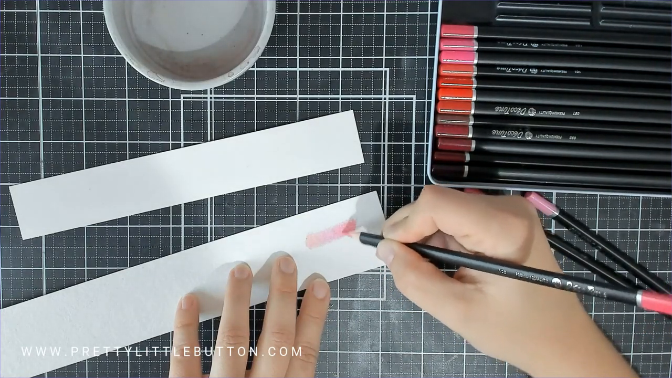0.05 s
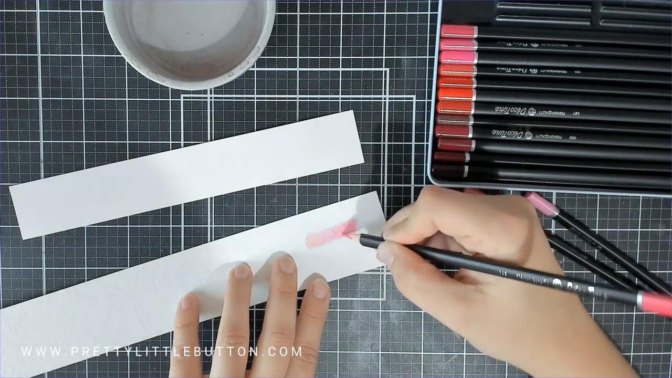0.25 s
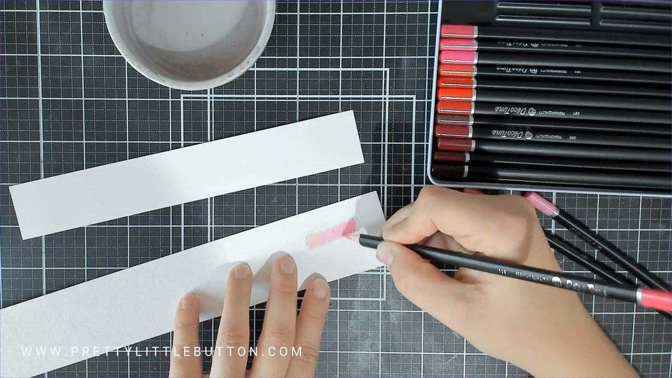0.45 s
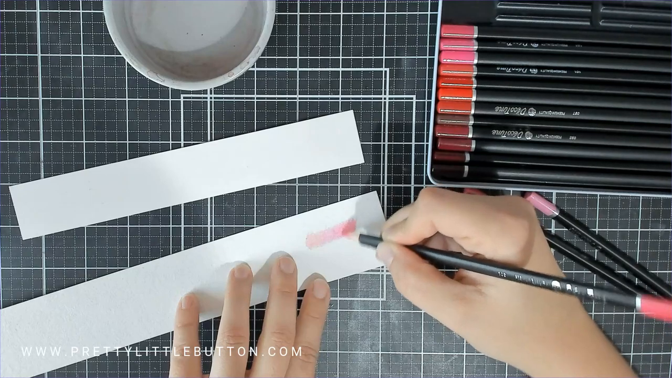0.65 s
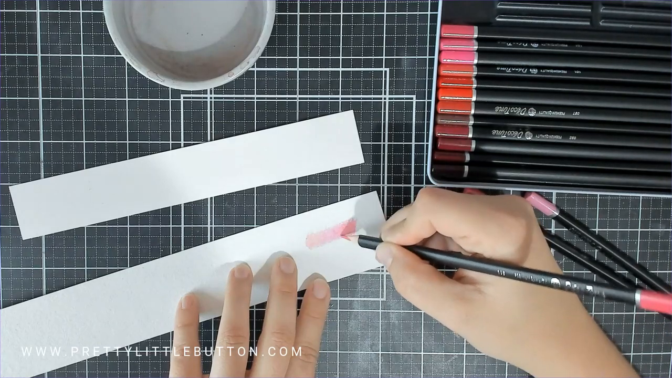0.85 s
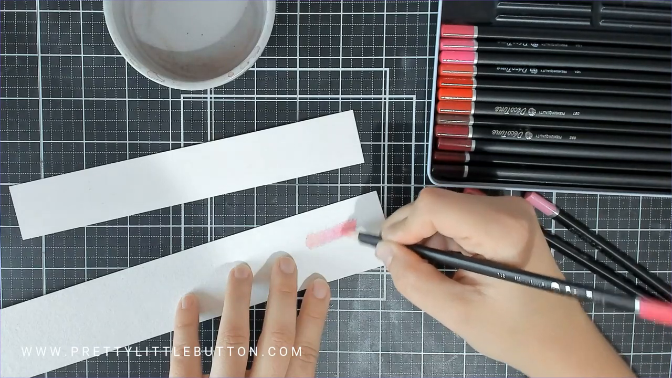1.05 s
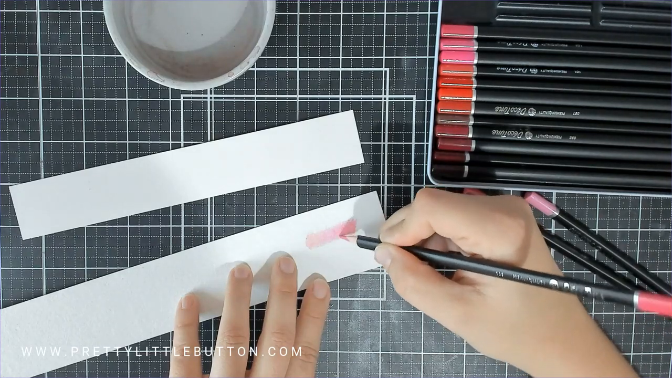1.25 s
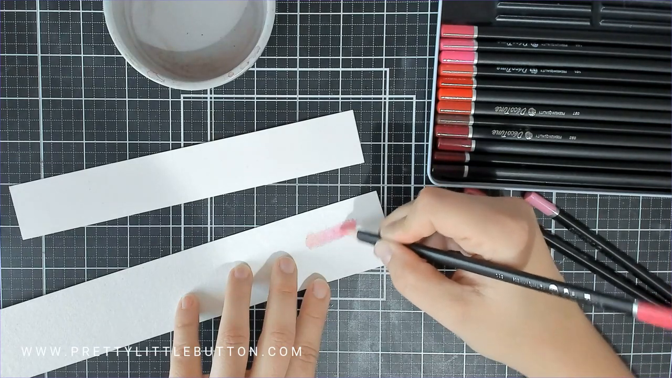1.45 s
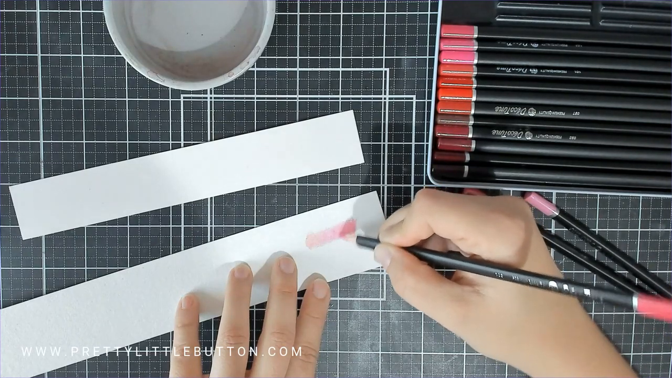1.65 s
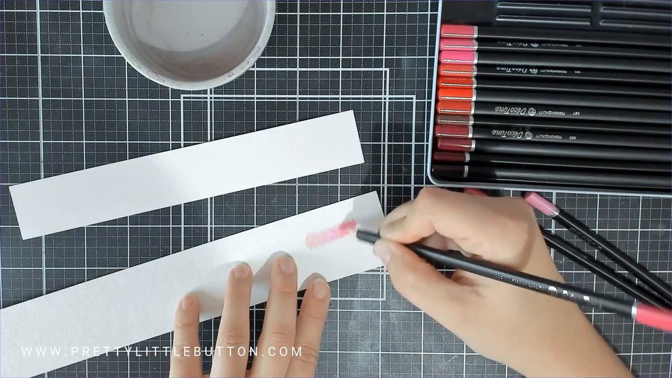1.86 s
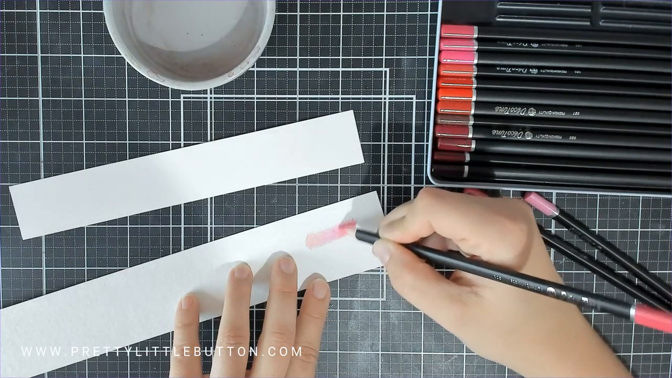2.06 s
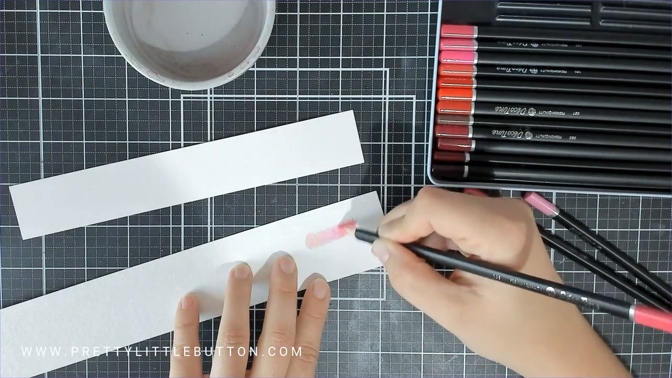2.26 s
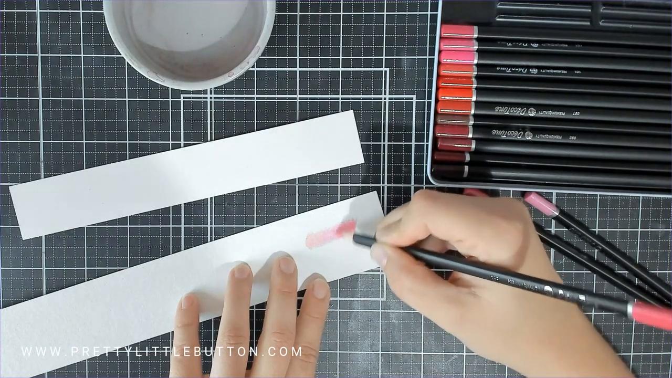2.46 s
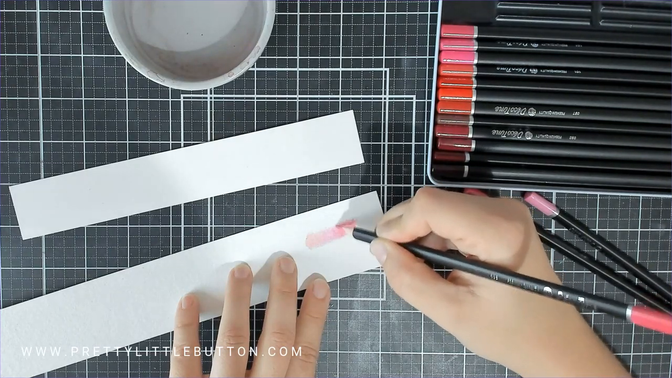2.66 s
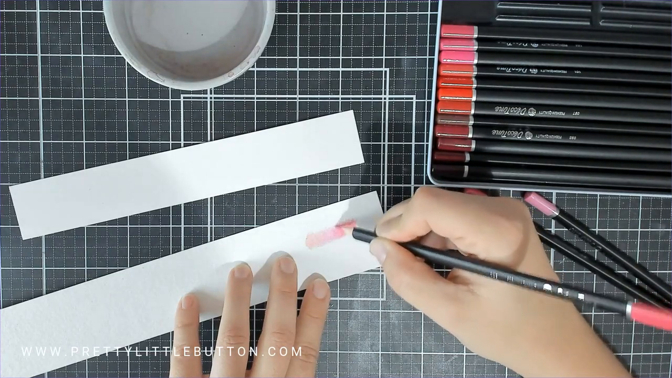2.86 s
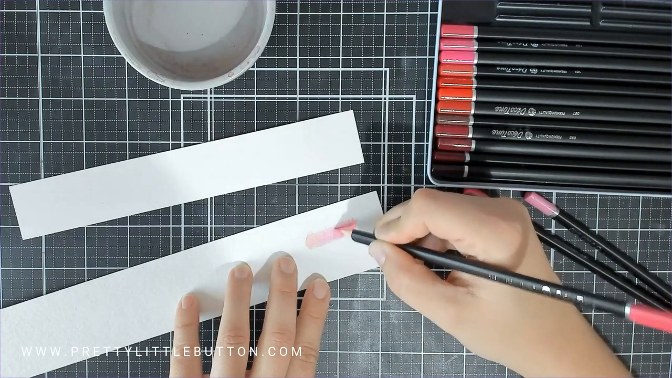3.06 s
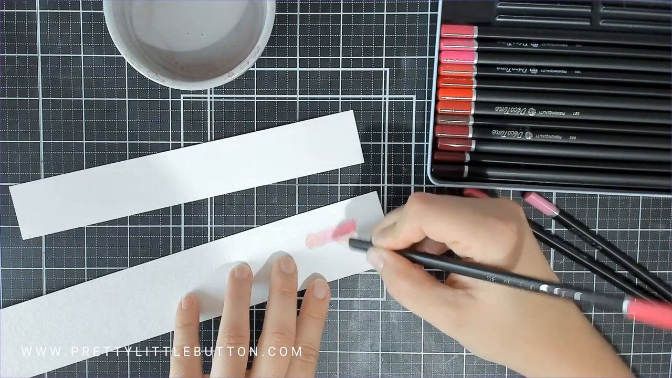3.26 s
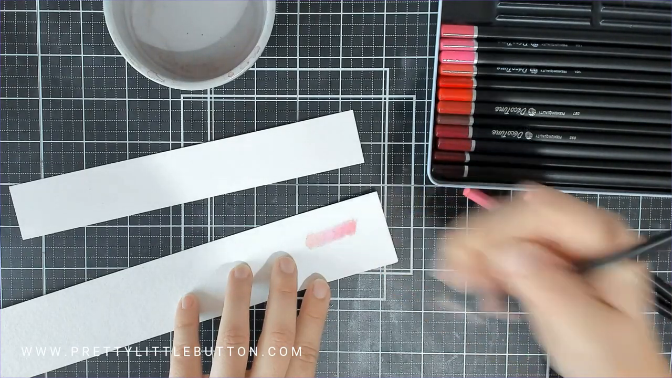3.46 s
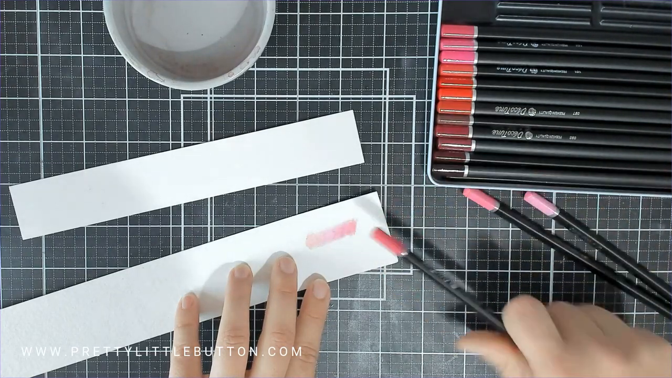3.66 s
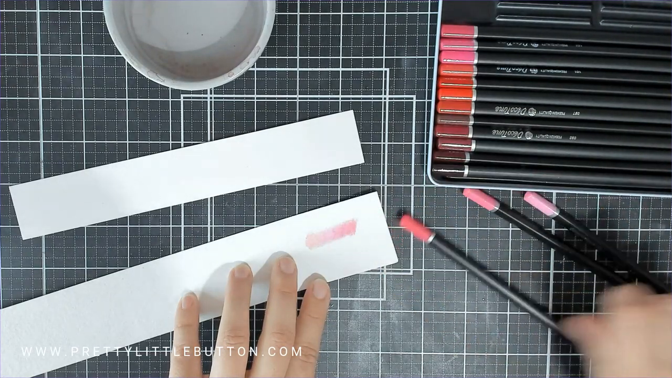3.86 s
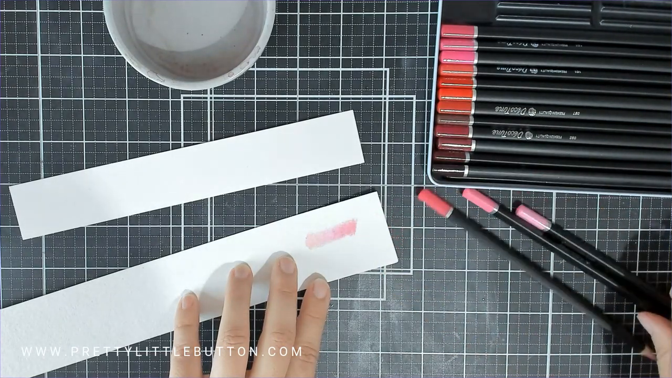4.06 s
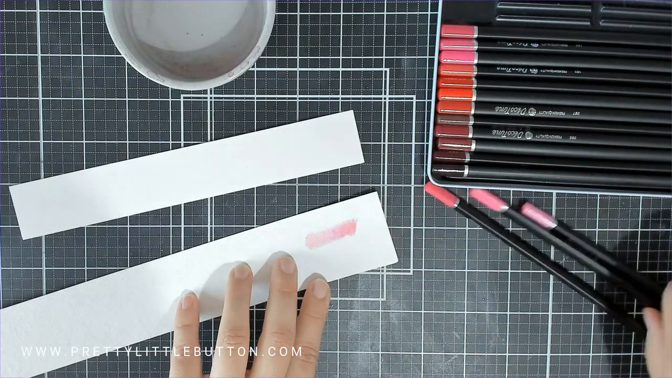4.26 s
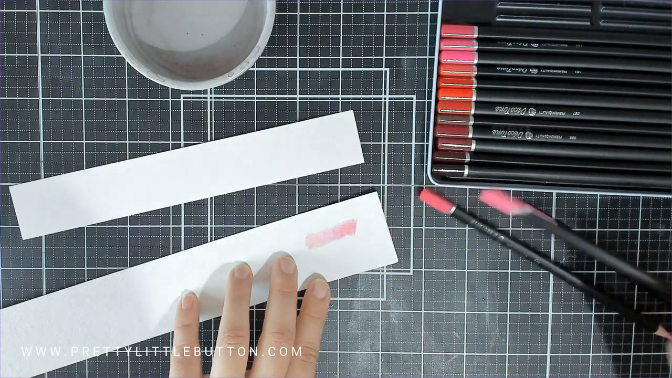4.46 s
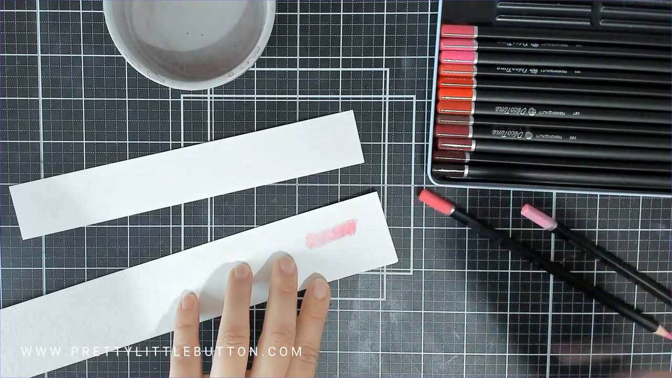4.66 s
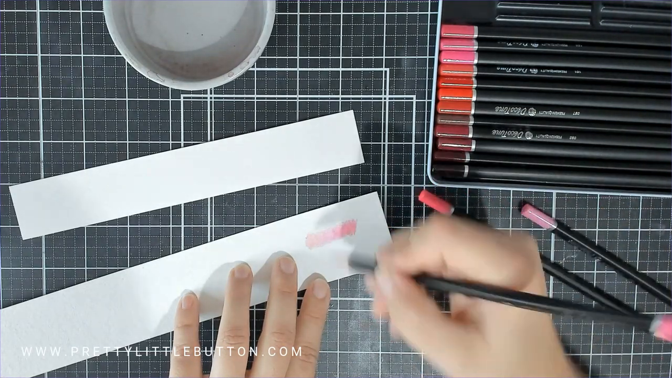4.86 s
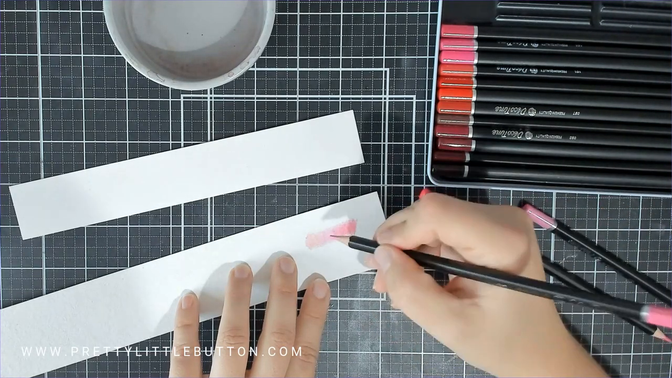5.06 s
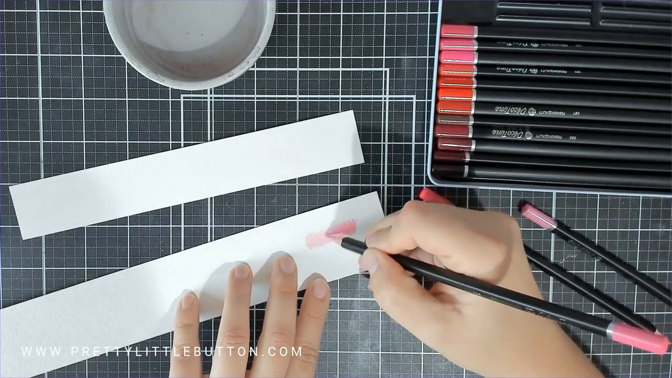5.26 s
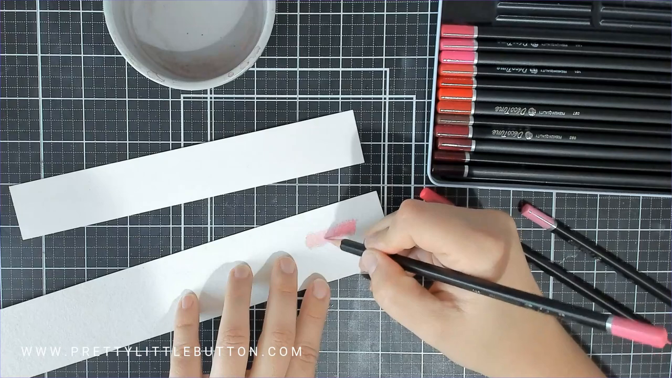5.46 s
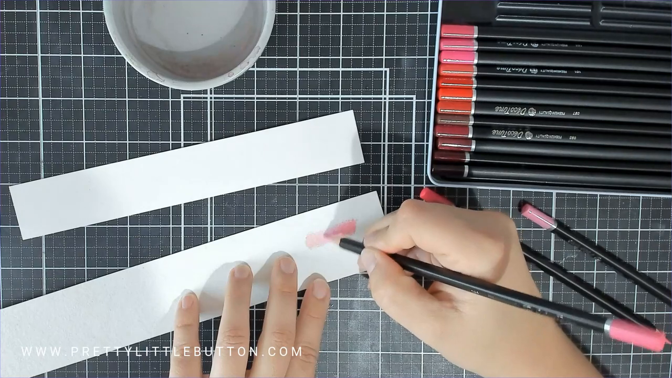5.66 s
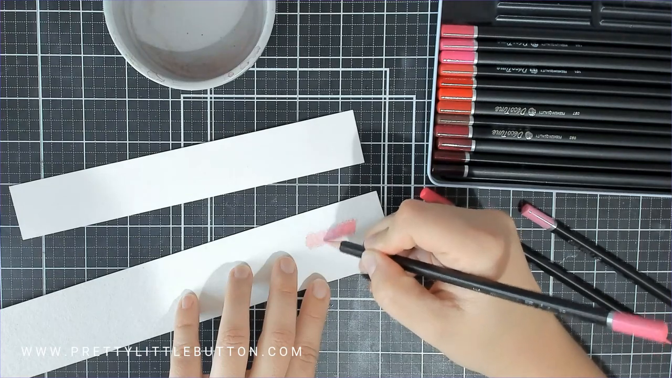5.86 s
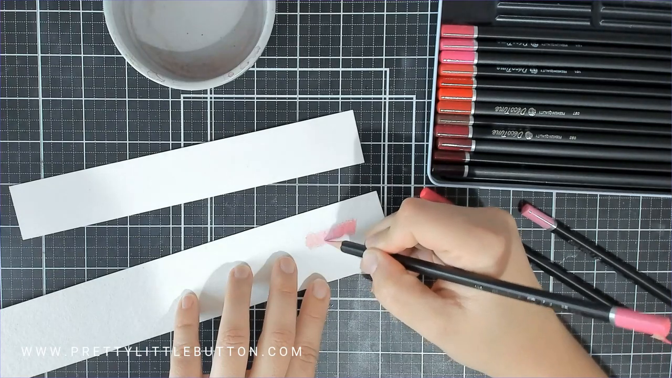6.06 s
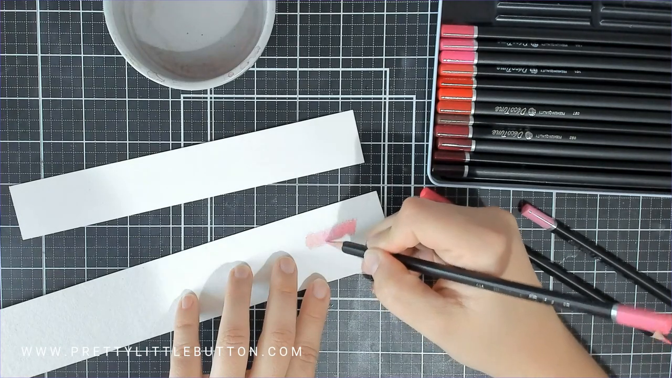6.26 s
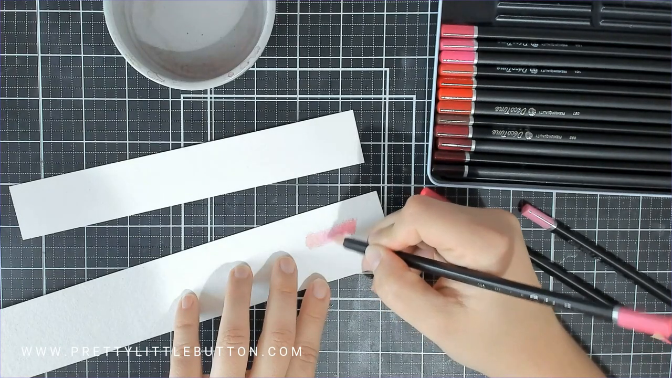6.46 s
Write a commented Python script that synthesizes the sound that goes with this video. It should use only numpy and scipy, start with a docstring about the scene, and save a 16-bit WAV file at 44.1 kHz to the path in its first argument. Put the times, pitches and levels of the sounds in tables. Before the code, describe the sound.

Soft rapid scribbling of a wooden pencil on paper, nearly buried in low table rumble and microphone hiss. After about three seconds it pauses; a hand slides faintly, then pencils hit the table and each other with dry, crisp clacks, rolling into scattered light taps and another pair of clear clicks. After a quieter gap, even fainter shading resumes and a minute snap sounds. Close microphone, small room, short reflections.

```python
"""Scratching comes first: a hand shades a paper strip with a wooden pencil, drops it among others,
picks up the next and shades on. Friction is noise through resonances, swelling with each stroke.
The table top wobbles at its low mode, a sine of randomly drifting phase; the microphone stand sways below it.
Each knock is a sum of decaying modes of table and pencil plus a crack, with early echoes and a small room.
A hand slides off the paper, the lead's tip snaps once, and microphone hiss lies under everything."""
import sys
import numpy as np
from scipy import signal
from scipy.fft import rfft, irfft
from scipy.io import wavfile
from scipy.ndimage import uniform_filter1d

SR = 44100
rng = np.random.default_rng(int(sys.argv[2]) if len(sys.argv) > 2 else 0)


def inscribe(sig):
    """Save sig as 16-bit PCM at rate SR to the path in sys.argv[1].

    A 1-D sig is mono; a 2-D sig holds one channel per row.
    Samples are clipped to [-1, 1] before scaling.
    """
    pcm = np.round(np.clip(np.atleast_2d(sig).T, -1, 1) * 32767)
    wavfile.write(sys.argv[1], SR, pcm.astype(np.int16))


N = 287532  # length in samples

# Spectrum of the microphone and room noise. Each row: frequency in Hz, relative density in dB per Hz.
HISS_SPECTRUM = [(74, -49), (125, -2), (234, 0.5), (269, 0.5), (428, -5.5), (668, -4.5), (1040, -10.5),
                 (1380, -11), (1690, -13.5), (2340, -15), (15600, -20)]
HISS_DB = -61.5  # rms level

# The table top's wobble, its pitch moving as the arm loads it.
# Each row: time in seconds, level in dB, pitch in Hz.
WOBBLE_CURVE = [(0, -47.5, 62.4), (.25, -49.5, 70.86), (.7, -44, 69.65), (1.1, -52, 62.3),
                (1.55, -44, 66.44), (1.85, -53.5, 62), (2.0, -43.5, 65), (2.4, -44.5, 70), (2.9, -50.5, 62),
                (3.04, -44, 66), (3.29, -58, 65.4), (3.45, -45.5, 67), (3.62, -47, 68), (3.69, -64, 69.1),
                (3.75, -51, 69.9), (3.83, -64, 70.8), (3.92, -45, 71.4), (4.1, -46.5, 71),
                (4.38, -67.5, 70.2), (4.54, -62.5, 90.2), (4.65, -56, 89.7), (4.8, -49.5, 67.4),
                (4.97, -64.5, 66), (5.04, -48, 65.2), (5.28, -45, 70.2), (5.37, -56, 77.2),
                (5.45, -45.5, 67.5), (5.79, -42, 66.5), (5.95, -54, 69.8), (6.04, -35, 64), (6.2, -44, 65),
                (6.52, -42.5, 64.4)]
THROB_DEPTH, THROB_LEAD = 0.39, 0.26  # how much each pull stroke swells the wobble (0-1), how early (strokes)

# The microphone stand's sway under the arm's motion. Each row: time in seconds, level in dB.
SHAKE_CURVE = [(0.0, -49.5), (0.23, -48), (3.32, -50.5), (4.03, -64), (4.65, -63), (4.88, -60.5),
               (5.96, -52.5), (6.52, -55)]
SWAY_HZ = 11

# Spells of steady shading. Each row: start in seconds, end in seconds, middle of a push stroke in seconds,
# strokes per second, pressure as a level in dB before the stroke's own swell.
SHADING_SPELLS = [(-.1, 3.08, 0.045, 9.73, -70.5), (5.15, 6.6, 6.13, 10.1, -74.5)]
# Resonances of lead on paper. Each row: frequency in Hz, width in Hz, relative level in dB.
LEAD_MODES = [(1850, 690, 1), (9400, 3100, -1), (290, 280, -19)]
# The table's note under the strokes. Each row: frequency in Hz, width in Hz, relative level in dB.
BOARD_MODES = [(684, 24, 0)]

# Knocks. Each row: time of the blow in seconds, then relative levels in dB of table, pencil shaft
# and lacquer click, then the favoured ring in Hz.
KNOCK_ROWS = [(2.9708, -55, -75, -70, 2640), (3.0036, -66, -66, -56, 8400), (3.447, -60, -59, -40, 11200),
              (3.452, -34.5, -60, -63, 6040), (3.4751, -30, -16.5, -34, 3100),
              (3.4832, -41, -33.5, -34.5, 2700), (3.5047, -59, -48, -53, 2870),
              (3.5233, -31.5, -58, -45, 2750), (3.5323, -47, -22, -43, 3230), (3.5405, -46, -38, -48, 4030),
              (3.5607, -50, -43, -43, 4000), (3.5767, -32, -37.5, -61, 3080),
              (3.6155, -38.5, -43, -72, 2300), (3.7023, -44.5, -51, -77, 2300),
              (3.7225, -50, -50, -75, 2390), (3.744, -45, -42, -46, 4440),
              (3.7768, -44.5, -40.5, -29, 4430), (3.8143, -45.5, -51, -52, 6370),
              (3.9246, -42, -40, -54, 3960), (3.9509, -43.5, -44.5, -47.5, 3900),
              (4.0208, -53, -53, -57, 8150), (4.0308, -46.5, -46, -58, 2480), (4.1123, -42, -55, -72, 2670),
              (4.153, -43, -58, -72, 2600), (4.1647, -30.5, -33, -26.5, 5250),
              (4.1774, -31.5, -30, -27, 3720), (4.2238, -39.5, -40, -51, 3700),
              (4.2996, -43.5, -46.5, -69, 2540), (4.3674, -44, -47.5, -78, 4004),
              (4.3793, -46, -50, -70, 2400), (4.402, -43, -48, -75, 2380),
              (4.4497, -45.5, -41.5, -78, 2380), (4.517, -51, -57, -75, 2560),
              (4.588, -48.5, -48, -66, 2270), (4.6824, -42.5, -46.5, -59.5, 4000),
              (4.6879, -57, -41, -67, 1450), (4.751, -50, -61, -84, 3074), (4.8012, -50, -53, -77, 2504),
              (4.864, -55, -69, -75, 2600), (4.9049, -50.5, -67, -75, 2740)]
# Modes a knock rings, table below 1 kHz and pencil above.
# Each row: nominal frequency in Hz, relative level in dB, t60 (time to fall 60 dB) in seconds.
RING_MODES = [(161.7, -10, 0.027), (363, -19, 0.015), (526, -3, 0.043), (544, 4.5, 0.025), (675, 11, 0.019),
              (937, 7, 0.019), (1117, -1.5, 0.034), (1250, 7, 0.015), (1505, 7, 0.0096),
              (1760, -0.5, 0.013), (2680, 2.5, 0.0074), (3085, 2, 0.0068), (3680, -7, 0.0085),
              (4000, -1, 0.019), (4300, -2, 0.019), (5080, -10, 0.027), (5500, -3, 0.0046),
              (6300, -3, 0.021), (7170, 4.5, 0.0065), (7840, 5.5, 0.0061), (8000, 0, 0.0033),
              (8740, 5.5, 0.0065), (9420, 4, 0.016), (12100, -7, 0.015)]
# Where the levels of a knock apply, from table to tip. Each entry: frequency in Hz.
ZONES_HZ = [650, 1600, 3200, 6300, 10000]
OVERTONE_SHARE, OVERTONE_DB, TIP_DB = 0.41, 1, -4  # share of the way from shaft to click; offsets in dB
KNOCK_DELAY_S, DIRECT_DB = .0008, 3  # every knock sounds slightly after its row's time: delay, gain of its direct sound

# First echoes off table top, tin and lamp. Each row: delay in seconds, level in dB.
ECHO_PATHS = [(.0012, -6), (.0027, -5), (.0046, -7)]
# Decay of the small room. Each row: frequency in Hz, t60 in seconds.
ROOM_DECAY = [(200, 0.24), (600, 0.14), (2000, 0.2), (5000, 0.17), (10000, 0.13), (15000, 0.16)]

# The hand's slide off the paper. Each row: time in seconds, level in dB.
SLIDE_CURVE = [(3.0, -73), (3.214, -61.5), (3.394, -76), (3.42, -70)]
# Resonances of skin on paper. Each row: frequency in Hz, width in Hz, relative level in dB.
SKIN_MODES = [(1650, 260, 2), (2200, 760, -1), (3720, 380, -4), (11700, 870, -3)]

# The lead's tip snaps on the paper: start in s, level in dB, frequency between its two modes, t60 in s
TICK_S, TICK_DB, TICK_HZ, TICK_T60 = 6.1865, -43, 7380, .012
EDGE_HZ = 15800  # upper band limit


def amp(db):
    """Decibels: twenty of them are a tenfold amplitude."""
    return 10 ** (np.asarray(db) / 20)


def evened(x):
    """Normalization: a signal divided by its root mean square has rms 1."""
    return x / np.sqrt(np.mean(x ** 2) + 1e-20)


def read(points, hz):
    """Interpolation of a spectrum on a logarithmic frequency axis."""
    f, value = np.transpose(points)
    return np.interp(np.log(hz + 1), np.log(f + 1), value)


def follow(rows):
    """Linear interpolation in time: every column of a curve, one value a sample."""
    s, *columns = np.transpose(rows)
    return [np.interp(np.arange(N) / SR, s, column) for column in columns]


def spell(rows, sound):
    """Amplitude envelope: the level of a curve's last column, faded in and out at the curve's ends."""
    t = np.arange(N) / SR
    fade = np.clip(np.minimum(t - rows[0][0], rows[-1][0] - t) / 0.049, 0, 1)
    return fade * amp(follow(rows)[-1]) * sound


def stroke_count(first, per_s):
    """Stroke phase: strokes since the middle of a push, so even numbers are pushes and odd ones pulls."""
    return (np.arange(N) / SR - first) * per_s


def resonate(x, hz, width):
    """Two-pole resonance: unit gain at its peak, less on either side."""
    b, a = signal.iirpeak(hz, hz / width, SR)
    return signal.lfilter(b, a, x)


def rubbed(modes, grit_db):
    """Friction: noise of uneven grain excites the resonances of what is rubbed."""
    unevenness = evened(uniform_filter1d(rng.standard_normal(N), size=300))
    grain = rng.standard_normal(N) * amp(grit_db * unevenness)
    return evened(sum(amp(db) * evened(resonate(grain, hz, width)) for hz, width, db in modes))


def hiss():
    """Stationary noise: white noise shaped by the spectrum of microphone and room."""
    hz = np.fft.rfftfreq(N, 1 / SR)
    spectrum = rfft(rng.standard_normal(N)) * amp(read(HISS_SPECTRUM, hz))
    return amp(HISS_DB) * evened(irfft(spectrum, N))


def wobble():
    """Low mode: its phase drifts at random, each pull swells it, and its neighbours shake as noise."""
    level_db, hz = follow(WOBBLE_CURVE)
    drift = uniform_filter1d(uniform_filter1d(rng.standard_normal(N), size=1500), size=1500)
    drift = 0.71 * evened(drift)  # radians
    mode = np.sqrt(2) * np.sin(2 * np.pi * np.cumsum(hz) / SR + drift)
    skirt = resonate(resonate(rng.standard_normal(N), 76.5, 30), 76.5, 30)
    skirt = evened(resonate(skirt, 89, 40))
    throb = np.ones(N)
    for start, end, first, per_s, _ in SHADING_SPELLS:
        strokes = stroke_count(first, per_s)
        swell = THROB_DEPTH * np.cos(np.pi * (strokes + THROB_LEAD))
        throb -= spell([(start, 0), (end, 0)], swell)
    return amp(level_db) * (throb * mode + amp(-14.5) * skirt)


def shake():
    """Oscillation: the stand's steady sway, with deep resonant noise above it."""
    level_db = follow(SHAKE_CURVE)[0]
    sway = np.sqrt(2) * np.sin(2 * np.pi * SWAY_HZ * np.arange(N) / SR)
    deep = evened(resonate(resonate(rng.standard_normal(N), 32.4, 30), 32.4, 30))
    deep_db = .6 * (level_db + 55.5) - 57.0  # follows the sway, over a narrower range
    return amp(level_db) * sway + amp(deep_db) * deep


def shading():
    """Friction grows with speed: the scratch peaks in mid-stroke, and pulls drive the table more than pushes."""
    scratch = rubbed(LEAD_MODES, grit_db=5.0)
    board = rubbed(BOARD_MODES, grit_db=4.5)
    out = np.zeros(N)
    for start, end, first, per_s, pressure_db in SHADING_SPELLS:
        strokes = stroke_count(first, per_s)
        speed = np.cos(np.pi * strokes) ** 2
        dig = 1 - 0.32 * np.cos(np.pi * strokes)  # larger on the pull
        pull = dig * np.cos(np.pi * (strokes + 0.082)) ** 4
        strokes_heard = speed * scratch + amp(1.5) * pull * board
        out += spell([(start, pressure_db), (end, pressure_db)], strokes_heard)
    return out


def ring(t, best_hz, zones, spot, detune):
    """Modal synthesis: a blow starts every mode, most those near the struck spot's favourite."""
    hz, mode_db, t60 = np.transpose(RING_MODES)[:, :, None]
    favour_db = 8.5 * np.exp(-(np.log(hz / best_hz) / 0.055) ** 2)
    size = amp(read(zones, hz) + mode_db + favour_db + 3.43 * spot - 12.0)
    rise = 1 - np.exp(-t * hz / 0.49)  # low modes take longer to start
    tone = np.sin(2 * np.pi * hz * (1 + 0.029 * detune) * t)
    return (size * rise * amp(-60 * t / t60) * tone).sum(0)


def crack(t, best_hz, zones, grit):
    """Impulse excitation: one impact and a little decaying grit, coloured by what is struck."""
    bins = np.fft.rfftfreq(512, 1 / SR) + 1
    impact = (t == 0) + 0.58 * grit * amp(-60 * t / 0.012)
    impact = np.roll(impact, 64)  # room ahead of the impact for the filter's symmetric response
    favour_db = 6.8 * np.exp(-(np.log(bins / best_hz) / 0.064) ** 2)
    colour_db = favour_db - 12.0 * np.exp(-bins / 500) - 12.0 * (bins / 15000) ** 4
    return irfft(rfft(impact) * amp(read(zones, bins) + colour_db + 6.0))


def knocks():
    """Impact: each blow is a sharp crack and a ring, sent both to the microphone and to the walls."""
    t, out = np.arange(SR // 8) / SR, np.zeros((2, N + SR))
    paths = np.array([[amp(DIRECT_DB)], [1]])  # to the microphone, to the walls
    chance = rng.standard_normal((len(KNOCK_ROWS), 2, len(RING_MODES), 1))
    grits = rng.standard_normal((len(KNOCK_ROWS), 512))
    for row, (spot, detune), grit in zip(KNOCK_ROWS, chance, grits):
        s, table_db, shaft_db, click_db, best_hz = row
        overtone_db = shaft_db + OVERTONE_SHARE * (click_db - shaft_db) + OVERTONE_DB
        levels = (table_db, shaft_db, overtone_db, click_db, click_db + TIP_DB)
        zones = list(zip(ZONES_HZ, levels))
        at = round((s + KNOCK_DELAY_S) * SR)
        out[:, at:at + len(t)] += paths * ring(t, best_hz, zones, spot, detune)
        out[:, at - 64:at + 448] += paths * crack(t[:512], best_hz, zones, grit)
    return out[:, :N]


def echoes(x):
    """Specular reflection: a few strong early copies, alternately upright and inverted."""
    out = np.zeros(N)
    for k, (s, db) in enumerate(ECHO_PATHS):
        out += (-1) ** k * amp(db) * np.roll(x, round(s * SR))
    return out


def room(x):
    """Reverberation: three sparse tails take turns so like knocks ring unlike; decay time varies with frequency."""
    places = np.arange(100, SR // 2, 20)
    out, turn = np.zeros(N), 2 * np.pi * 7.3 * np.arange(N) / SR
    for k in range(3):
        taps = np.zeros(SR // 2 + 20)
        taps[places + rng.integers(0, 20, len(places))] = rng.choice([-1., 1.], len(places))
        hz, t, z = signal.stft(taps, SR, nperseg=256)
        decay = amp(-60 * t / read(ROOM_DECAY, hz)[:, None])
        tail = signal.istft(z * decay, SR, nperseg=256)[1]
        share = np.sqrt(2 / 3) * np.cos(turn + k * np.pi / 3)  # squares of the three shares add up to 1
        out += signal.oaconvolve(x * share, tail / np.linalg.norm(tail))[:N]
    return out


def slide():
    """Sliding friction: skin brushes over paper."""
    return spell(SLIDE_CURVE, rubbed(SKIN_MODES, grit_db=1.0))


def tick():
    """Free decay: a close pair of high modes dies away as a tiny click."""
    t = np.clip(np.arange(N) / SR - TICK_S, 0, 1)
    lower = np.sin(2 * np.pi * TICK_HZ * 0.955 * t)
    upper = 0.52 * np.sin(2 * np.pi * TICK_HZ * 1.14 * t)
    return amp(TICK_DB - 60 * t / TICK_T60) * (lower + upper)


def scene():
    """Superposition: steady noise, table and stand, rubbing, and blows with their echoes and room."""
    direct, blows = knocks()
    dulled = signal.lfilter(*signal.butter(1, 8000, fs=SR), blows)  # soft surfaces swallow the top
    snap = tick()
    reverberant = amp(7.0) * room(dulled + amp(-9.0) * snap)
    struck = direct + echoes(direct) + reverberant + snap
    return (hiss() + wobble() + shake() + shading() + struck + slide())[None]


def record(dry):
    """Band limiting: a linear-phase low-pass filter removes what lies above the edge."""
    lowpass = signal.firwin(511, EDGE_HZ, window=("kaiser", 9), fs=SR)
    return signal.oaconvolve(dry, lowpass[None], "same")


dry = scene()
out = record(dry)
inscribe(out)
```